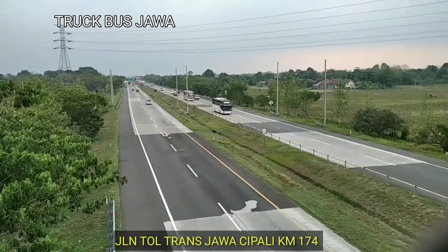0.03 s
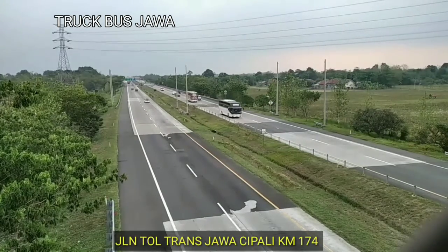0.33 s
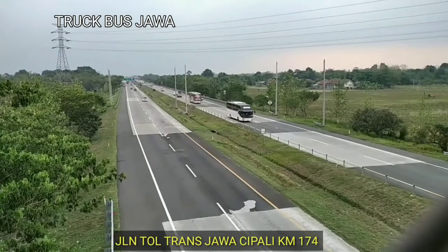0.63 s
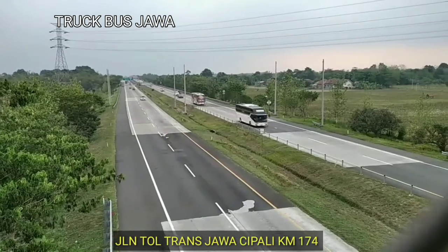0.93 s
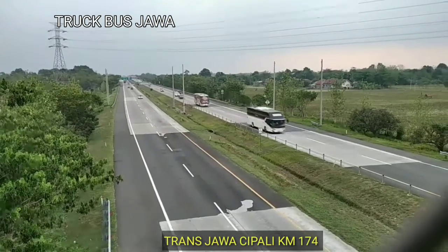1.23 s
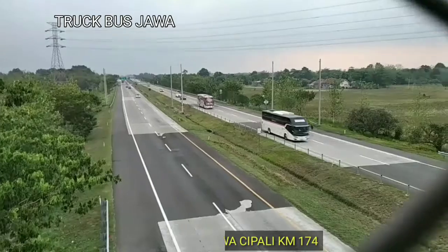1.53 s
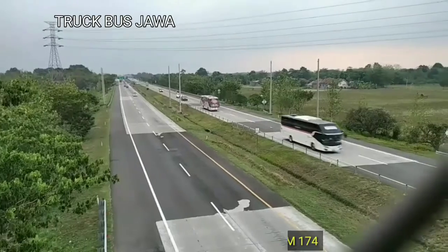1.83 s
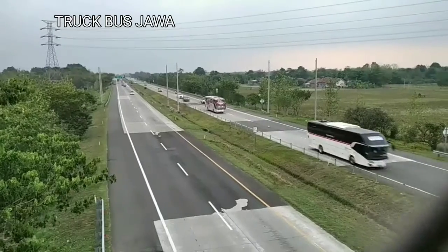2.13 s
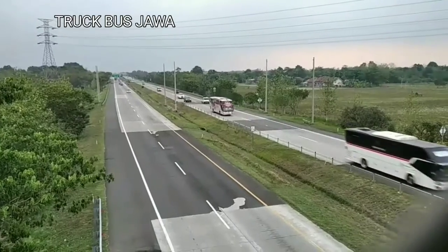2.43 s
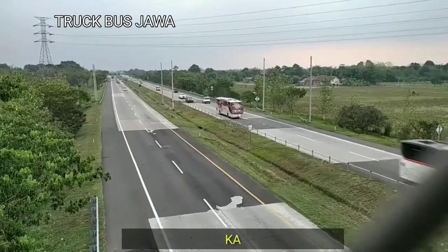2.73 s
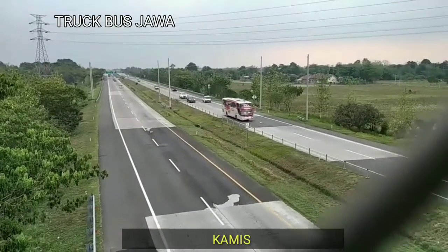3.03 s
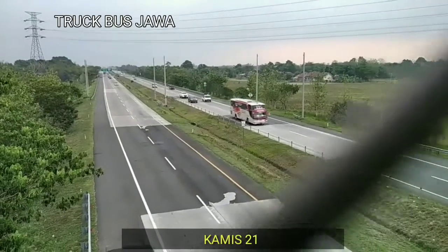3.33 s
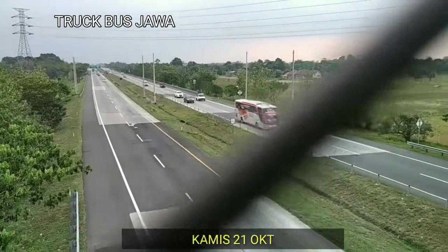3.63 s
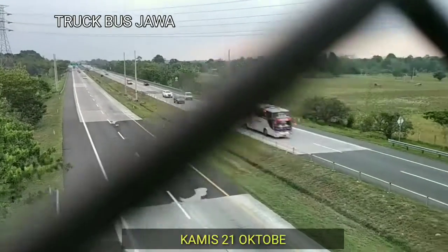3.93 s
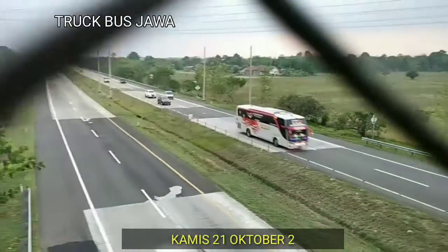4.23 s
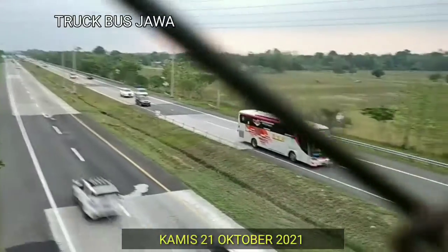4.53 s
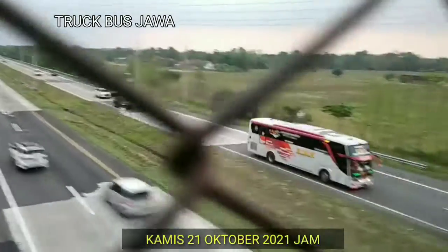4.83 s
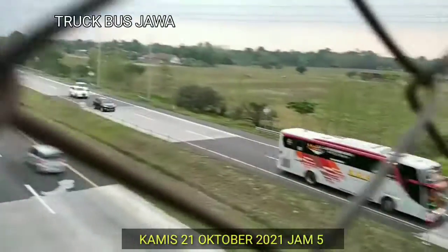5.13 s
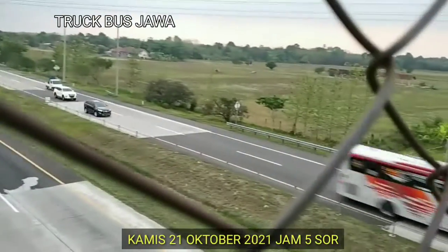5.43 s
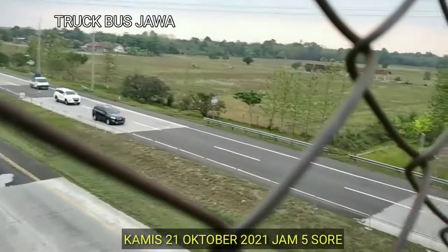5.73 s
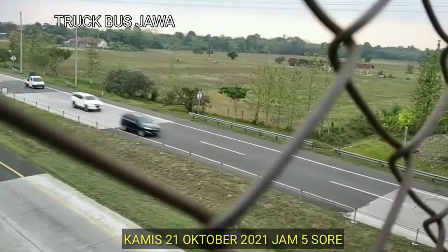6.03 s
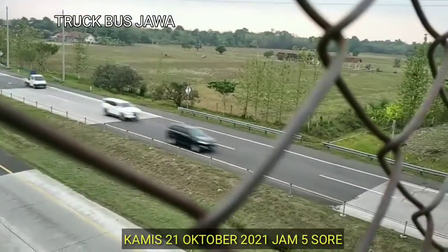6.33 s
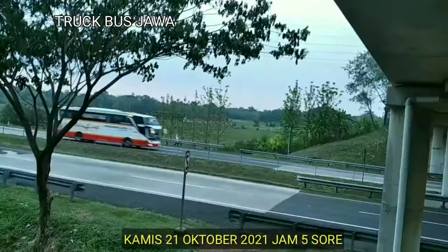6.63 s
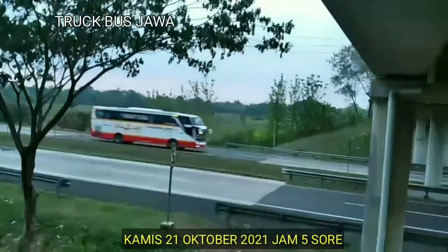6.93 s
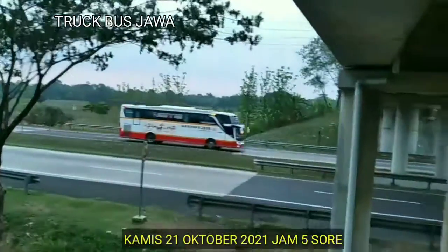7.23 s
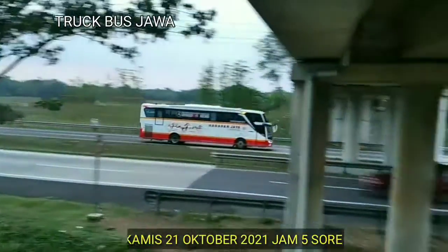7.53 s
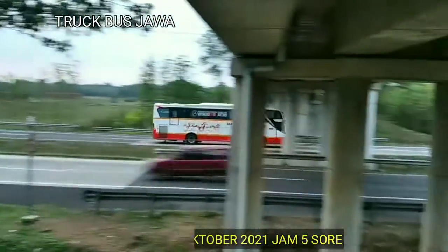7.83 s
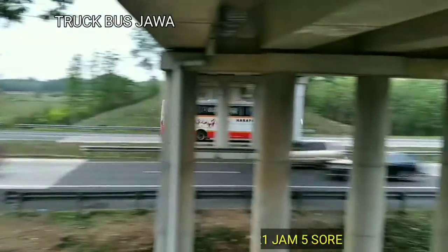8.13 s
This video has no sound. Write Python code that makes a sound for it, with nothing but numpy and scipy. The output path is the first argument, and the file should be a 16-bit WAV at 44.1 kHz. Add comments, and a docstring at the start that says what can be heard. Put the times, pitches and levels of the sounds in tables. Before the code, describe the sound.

Two diesel coaches and several cars roar past on a highway, fade to brief silence, then traffic returns closer and louder.

```python
"""Highway traffic at two microphone ports: coaches roar past an overpass, then cars run out and recede.
The sound fades to silence and returns under the bridge, closer and louder.
Road noise is four bands (body rumble, tyre roar, tread noise, air hiss) that swell and sink with
distance and reach the ports with a moving lag. Diesels drone below it, air whistles round a coach,
tyres knock on road joints; small ticks and faint chirps lie on top."""
import sys
import numpy as np
from scipy import signal
from scipy.fft import rfft, irfft, next_fast_len
from scipy.io import wavfile
from scipy.ndimage import map_coordinates

SR = 44100
rng = np.random.default_rng(int(sys.argv[2]) if len(sys.argv) > 2 else 0)


def bounce(signal):
    """Save signal as a 16-bit WAV file at the path given by the first command-line argument."""
    frames = np.transpose(np.atleast_2d(signal))
    limited = np.clip(frames, -1, 1)
    pcm = np.round(limited * 32767).astype(np.int16)
    wavfile.write(sys.argv[1], SR, pcm)


N = 366030

# Swells of road noise as vehicles near and go by; one coach can swell more than once as it crosses rough
# concrete and passes: (closest [s], approach [s], retreat [s], rumble [dB], roar [dB], tread [dB], hiss [dB])
COACH_PASSES = [(2.2, 0.66, 1, -33, -34, -32, -37), (2.82, 0.83, 1, -33.5, -32, -36, -34.5),
                (3.3, 0.26, 0.27, -30.5, -35.5, -40, -35.5), (3.68, 0.3, 0.32, -32.5, -40, -32, -33)]
CAR_PASSES = [(4.2, 0.16, 0.43, -30.5, -37, -27, -34.5), (4.54, 0.35, 0.57, -45, -31, -26.5, -33),
              (5.1, 0.21, 0.55, -38, -36, -31, -39), (5.8, 0.5, 0.88, -36.5, -36, -32.5, -37)]
UNDERPASS_PASSES = [(7.82, 0.3, 0.22, -28.5, -25, -37.5, -29.5), (8.13, 0.35, 0.82, -30, -21.5, -37.5, -29)]
# Steady far traffic: (rumble [dB], roar [dB], tread [dB], hiss [dB])
OVERPASS_WASH_DB = [-35.5, -37, -35, -42.5]
UNDERPASS_WASH_DB = [-27.5, -26, -22.5, -29.5]
# Distance exponents of power; air and barriers absorb treble: (rumble [-], roar [-], tread [-], hiss [-])
FALLOFF_EXPONENTS = [2.7, 3.4, 5.1, 5.9]
# Crossovers: (rumble to roar [Hz], roar to tread [Hz], tread to hiss [Hz])
BAND_EDGES_HZ = [430, 1100, 3000]
# Road noise spectra: (frequency [Hz], relative density [dB], left over right [dB])
COACH_SPECTRUM = [(54, -26.5, -1), (71, -12.5, -4.5), (113, -1.5, 2), (260, 0, 0), (403, -5, -2.5),
                  (563, -6, 4), (895, -3, -0.5), (1140, -7.5, 1.5), (1500, -5, 1), (2700, -12.5, 8.5),
                  (3470, -15, -1), (4820, -14.5, 8.5), (4860, -21.5, 8.5), (5500, -22, 6), (6850, -24, -1),
                  (8800, -20, 10.5), (11800, -29.5, 9.5), (14000, -32.5, 14)]
CAR_SPECTRUM = [(56, -25.5, -1.5), (70, -16, -3), (100, -1.5, -1), (175, 0.5, -5), (290, 3.5, -2),
                (420, 0, 4), (545, -6.5, -1.5), (695, 0.5, 0), (860, 2, 0.8), (1300, -3.5, -1.5),
                (1735, -3, 0.5), (2390, -9, 1.5), (3200, -12, 4.5), (4680, -10.5, 11), (4870, -18.5, -1),
                (8200, -15.5, 5), (11500, -24.5, 8), (14000, -26.5, 12.5)]
UNDERPASS_SPECTRUM = [(40.8, -23, -5), (55, -20, -4), (128, -10.5, 2), (252, -2.5, -0.5), (320, -3, 1.5),
                      (408, -7.5, -1.5), (503, -5, 0), (640, -5.5, -1), (950, -5.5, -0.5), (1500, -7, 1),
                      (2580, -9.5, 1.5), (4670, -18, 0.5), (4960, -25.5, -2), (7100, -23, 0.5),
                      (10500, -32.5, 1.5), (14000, -39.5, 1.4)]
FAR_SPECTRUM = [(51.5, -27, -2), (66, -12, 0), (119.5, 0, -0.5), (200, -1.5, 2), (260, -1.5, -1),
                (429, -3.5, 4), (500, -8.5, -9), (620, -13, -3), (1300, -6, 0.5), (2000, -11, -1),
                (2400, -8, -3.5), (2840, -16, -6), (3260, -24, 2), (4600, -17.5, 1), (4900, -26, -4),
                (8800, -27.5, 1), (14000, -36, 7)]
# Treble on the overpass: (time [s], gain [dB])
TREBLE_GAIN = [(0, -0.5), (1.2, -0.5), (1.68, -4.5), (1.73, -1), (2.2, -0.5), (4.84, -0.5), (4.9, -1),
               (5.6, -0.5), (6.3, -4.5)]
# Tyre and air resonances: (start [s], end [s], from [Hz], to [Hz], half width [octaves], boost [dB])
RESONANCES = [(1.75, 2.7, 1520, 1425, 0.2, 3.5), (2.64, 3.027, 780, 790, 0.18, 5.5),
              (3.033, 3.5, 870, 830, 0.38, 0.5), (2.79, 3.3, 325, 318, 0.12, 4),
              (3.12, 3.597, 3650, 3460, 0.073, 5.5), (3.15, 3.93, 8900, 8800, 0.14, 3.5),
              (3.548, 3.972, 359, 336, 0.073, 8), (4.002, 4.24, 533, 490, 0.33, 7),
              (4.053, 4.42, 1290, 1120, .3, 3), (4.202, 4.8, 7600, 7040, .6, 1),
              (4.47, 4.602, 952, 861, .22, 4.5), (4.551, 4.76, 2625, 2550, .12, 5),
              (4.6, 5.299, 1750, 1650, 0.33, 3), (5.285, 5.55, 803, 790, 0.47, 5),
              (6.8, 7.5, 1330, 1400, 0.16, 0.5), (7.0, 8.197, 243, 257, 0.099, 5.5),
              (7.72, 8.45, 730, 710, 0.26, 2.5)]
# Direction of the loudest vehicle: (time [s], left port lag [ms], direct over scattered [dB])
BEARING_ABOVE = [(0, -0.051, 0.5), (1.6, -0.086, -6), (2.5, -0.14, 0.5), (3.5, -0.29, -4.5),
                 (3.95, -0.4, -6), (4.08, -0.17, -1), (4.55, -0.078, 2), (5.45, 0.17, 3),
                 (6.5, 0.27, -11.5)]
BEARING_BELOW = [(6.85, -0.39, -0.5), (7.6, -0.33, -9), (7.9, -0.071, -7.5), (8.3, 0.15, 2.5)]
# Direct over scattered sound, by pitch: (frequency [Hz], offset [dB])
DIRECT_OFFSET = [(100, 4), (400, -1), (600, -2.5), (880, 8), (1130, -2.5), (1450, 3), (1950, -2), (2300, 0),
                 (2750, -3.5), (3300, -0.5), (4500, -7), (8000, -15.5)]
# First coach diesel: (time [s], crank rate [Hz], level of each of five orders [dB])
COACH_1_DIESEL = [(0, 39.25, -63, -52, -51, -51, -54), (1.1, 39.5, -55, -58, -39.5, -55, -51),
                  (1.7, 38.78, -44, -52.5, -44, -38, -41), (2.3, 38.1, -44, -43, -48, -40.5, -37),
                  (2.9, 37.34, -47, -39, -53.5, -55, -48.5), (3.8, 36.5, -69.5, -62, -65.5, -64, -60.5)]
# Its orders: (multiple of crank rate [-])
COACH_1_ORDERS = [2, 4, 5, 6, 7]
# Second coach diesel: (time [s], firing rate [Hz], level of each of orders 1-3 [dB])
COACH_2_DIESEL = [(2.3, 117.2, -63, -60, -66), (2.85, 118.5, -51.5, -39, -52), (3.15, 116.1, -40, -34, -47),
                  (3.5, 115.8, -36, -30, -41), (3.85, 111.5, -38.5, -42, -42.5),
                  (4.35, 109.5, -45.5, -45.5, -49), (5.0, 107.4, -44.5, -39.5, -53),
                  (5.65, 105.7, -52, -39.5, -51), (6.0, 105.5, -60, -50, -60.5)]
# Car whine, far lorry, diesel and drone under the bridge: (time [s], fundamental [Hz], level [dB])
CAR_ENGINE = [(3.85, 520, -69.5), (4.12, 500, -39), (4.3, 488, -42), (4.6, 490, -42.5), (4.85, 480, -43),
              (5.2, 475, -81)]
LORRY_DIESEL = [(3.8, 89, -70), (4.4, 88, -46), (5.1, 87, -44.5), (5.8, 86.5, -47)]
UNDERPASS_DIESEL = [(6.88, 58.7, -52), (7.0, 59.1, -38.5), (7.6, 58.98, -34), (8.3, 57.85, -31)]
UNDERPASS_DRONE = [(6.9, 97.3, -51), (7.05, 97.2, -34.5), (7.7, 96.6, -37), (8.3, 96.5, -29.5)]
# Orders of the underpass diesel: (multiple of firing rate [-], gain [dB])
UNDERPASS_ORDERS = [(1, -5.5), (2, -10), (3, -3.5), (4, -1), (6, -1.5), (11, -6.5)]
# Air whistle round a coach: (time [s], pitch [Hz], level [dB])
AIR_WHISTLE = [(3.51, 4740, -80), (3.54, 4700, -33.5), (3.69, 4620, -39), (3.76, 4680, -31),
               (3.88, 4550, -33.5), (3.97, 4500, -33), (4.01, 4500, -89)]
# Tyres on road joints: (time [s], peak before filter [dB], centre [Hz])
JOINT_KNOCKS = [(4.141, -5, 1020), (4.203, -14.5, 1334), (4.228, -7.5, 970), (4.386, -2.5, 1050),
                (4.443, -14, 950), (4.559, -7, 860), (4.804, -5, 775), (4.886, -3.5, 1090),
                (5.261, -15, 1650), (5.527, -10.5, 898), (6.375, -17, 975)]
# Dry ticks: (time [s], peak before filter [dB])
DRY_TICKS = [(1.7115, -28.5), (2.48, -20), (2.6905, -12.5)]
# High chirps: (time [s], pitch [Hz], level [dB])
HIGH_CHIRPS = [(5.305, 12470, -47), (5.94, 9950, -38), (6.02, 9950, -44), (6.104, 10050, -38)]

SILENT_FROM_S, RETURN_S = 6.6, 6.8
PORT_SPACING_MS, CUTOFF_HZ = 0.46, 14300
FRAME, HOP = 2048, 512
TIME_S = np.arange(N) / SR
FRAME_S = np.arange(N // HOP + 2) * HOP / SR
BIN_HZ = np.maximum(np.arange(FRAME // 2 + 1) * SR / FRAME, 1)[:, None]


def traffic(treble_from_hz=4400):
    """Road noise of passing and far vehicles, on the overpass and then under the bridge."""
    above = passing(COACH_PASSES, COACH_SPECTRUM) + passing(CAR_PASSES, CAR_SPECTRUM) + far_wash()
    treble = 1 / (1 + (treble_from_hz / BIN_HZ) ** 4)
    above *= from_db(treble * in_time(TREBLE_GAIN, FRAME_S)[0]) ** 2
    below = passing(UNDERPASS_PASSES, UNDERPASS_SPECTRUM)
    below += road_power(UNDERPASS_SPECTRUM, UNDERPASS_WASH_DB)
    power = np.where(under_bridge(FRAME_S), below, above) * from_db(howls_db()) ** 2
    field = port_field(power)
    waver_db = flutter_db(depth_db=0.78, rate_hz=26, bands=12)
    waver_db += flutter_db(depth_db=2.0, rate_hz=8, bands=170)
    waver_db += flutter_db(depth_db=0.74, rate_hz=0.76, bands=110)   # slow fine ripple in the timbre of the ports
    roar = signal.istft(field * from_db(waver_db), nperseg=FRAME, noverlap=FRAME - HOP)[1][:, :N]
    turbulence_db = 0.86 * drift(45)
    return from_db(turbulence_db) * roar


def passing(vehicles, spectrum):
    """Power of vehicles on a straight road; nearness is closest over present distance."""
    power = 0
    for closest_s, approach_s, retreat_s, *levels_db in vehicles:
        scale_s = np.where(FRAME_S < closest_s, approach_s, retreat_s)
        nearness = 1 / np.hypot(1, (FRAME_S - closest_s) / scale_s)
        power += road_power(spectrum, levels_db, nearness)
    return power


def road_power(spectrum, levels_db, nearness=1):
    """Power per port of four overlapping bands, each with its own falloff over distance."""
    density_db, pan_db = in_pitch(spectrum)
    lowpasses = [0] + [1 / (1 + (BIN_HZ / hz) ** 8) for hz in BAND_EDGES_HZ] + [1]
    power = 0
    for low, high, db, exponent in zip(lowpasses, lowpasses[1:], levels_db, FALLOFF_EXPONENTS):
        band = from_db(density_db) ** 2 * (high - low)
        power += band / band.mean(axis=0) * from_db(db) ** 2 * nearness ** exponent
    left_share = 1 / (1 + from_db(-pan_db) ** 2)
    return 2 * np.array([left_share, 1 - left_share]) * power


def howls_db(edge_s=0.034, wobble=0.012):
    """Tyre and air resonances: gliding boosts of the road noise."""
    boost_db = 0
    for start_s, end_s, from_hz, to_hz, width_oct, db in RESONANCES:
        gate = (np.tanh((FRAME_S - start_s) / edge_s) - np.tanh((FRAME_S - end_s) / edge_s)) / 2
        hz = np.interp(FRAME_S, [start_s, end_s], [from_hz, to_hz]) * (1 + wobble * drift(30, FRAME_S))
        boost_db += db * gate * np.exp(-(np.log2(BIN_HZ / hz) / width_oct) ** 2)
    return boost_db


def port_field(power):
    """Noise spectra at the ports: direct sound with a lag, plus scatter, coherent for long waves."""
    lag_ms, direct_db = np.where(under_bridge(FRAME_S),
                                 in_time(BEARING_BELOW, FRAME_S), in_time(BEARING_ABOVE, FRAME_S))
    sides = np.array([1, -1])[:, None, None]
    direct = white_stft() * np.exp(-1j * np.pi * sides * BIN_HZ * lag_ms / 1000)
    coherence = 0.92 * np.sinc(2 * BIN_HZ * PORT_SPACING_MS / 1000)
    common = np.sqrt((1 + coherence) / 2) * white_stft()
    opposed = sides * np.sqrt((1 - coherence) / 2) * white_stft()
    ratio = from_db(direct_db + in_pitch(DIRECT_OFFSET)[0])
    return (ratio * direct + common + opposed) * np.sqrt(power / (1 + ratio ** 2))


def flutter_db(depth_db, rate_hz, bands):
    """Paths of changing length add and cancel: the level wavers band by band."""
    position = np.interp(np.log(BIN_HZ + 500), np.log([500, CUTOFF_HZ + 500]), [0, bands - 1])
    weights = np.sqrt(np.maximum(1 - abs(position - np.arange(bands)), 0))
    return depth_db * weights @ np.array([drift(rate_hz, FRAME_S) for _ in range(bands)])


def engines():
    """Two coaches, a car and a lorry drop in pitch as they pass; two engines drone under the bridge."""
    crank_hz, *orders_db = in_time(COACH_1_DIESEL)
    coach_1 = engine(crank_hz, 0, zip(COACH_1_ORDERS, orders_db), wobble=0.013, waver_db=3)
    firing_hz, *orders_db = in_time(COACH_2_DIESEL)
    coach_2 = engine(firing_hz, 0, enumerate(orders_db, 1), wobble=0.0084, waver_db=1.5)
    car = engine(*in_time(CAR_ENGINE), [(1, 0)], wobble=0.01175, waver_db=3)
    lorry = engine(*in_time(LORRY_DIESEL), [(1, -2.5), (2, -1), (4, -6.5)], wobble=0.012, waver_db=4.5)
    diesel = engine(*in_time(UNDERPASS_DIESEL), UNDERPASS_ORDERS, wobble=0.0043, waver_db=3)
    drone = engine(*in_time(UNDERPASS_DRONE), [(1, -1.1)], wobble=0.0095, waver_db=0.5)
    return np.where(under_bridge(TIME_S), diesel + drone, coach_1 + coach_2 + car + lorry)


def engine(hz, db, orders, wobble, waver_db):
    """Harmonics of an engine's rate, unsteady in pitch and level."""
    phase = 2 * np.pi * np.cumsum(hz * (1 + wobble * drift(18))) / SR
    tones = 0
    for order, order_db in orders:
        gain = from_db(order_db + waver_db * drift(9))
        tones += gain * np.sin(order * phase + rng.uniform(0, 2 * np.pi))
    return np.sqrt(2) * from_db(db) * tones


def whistle(width_hz=280, waver_db=3, right_db=-5.5):
    """Air through a gap: a breathy tone that sags in pitch and breaks off."""
    hz, db = in_time(AIR_WHISTLE)
    db += waver_db * drift(35)
    phase = 2 * np.pi * np.cumsum(hz) / SR
    ports = [drift(width_hz) * np.sin(phase) + drift(width_hz) * np.cos(phase) for _ in range(2)]
    return from_db([db, db + right_db]) * ports


def knocks(spread=1.18):
    """Tyres strike road joints: narrow noise bursts."""
    return sum(bursts([(s, db)], hz / spread, hz * spread, rise_s=0.023, t60_s=0.063)
               for s, db, hz in JOINT_KNOCKS)


def ticks(right_db=-17):
    """Small dry ticks near the left port."""
    left = bursts(DRY_TICKS, low_hz=5870, high_hz=11100, rise_s=0.011, t60_s=0.021)
    return np.array([left, from_db(right_db) * left])


def chirps(half_width_s=0.017):
    """Faint, short sine peeps."""
    return sum(from_db(db) * np.exp(-((TIME_S - s) / half_width_s) ** 2)
               * np.sin(2 * np.pi * hz * TIME_S) for s, hz, db in HIGH_CHIRPS)


def far_wash(turn_s=(2.2, 3.5), turned_db=-5):
    """Power of far traffic; sinks as the microphone turns from the road ahead."""
    facing_db = np.interp(FRAME_S, turn_s, [0, turned_db])
    return from_db(facing_db) ** 2 * road_power(FAR_SPECTRUM, OVERPASS_WASH_DB)


def bursts(events, low_hz, high_hz, rise_s, t60_s):
    """Band-passed noise puffs: 60 dB up in rise_s, 60 dB down in t60_s."""
    envelope = 0
    for s, db in events:
        drop_db = 60 * np.maximum((s - TIME_S) / rise_s, (TIME_S - s) / t60_s)
        envelope += from_db(db - np.minimum(drop_db, 120))
    band = signal.butter(2, [low_hz, high_hz], "band", fs=SR, output="sos")
    return signal.sosfilt(band, envelope * rng.standard_normal(N) + 1e-18)


def from_db(db):
    """Decibels to gain."""
    return 10 ** (np.asarray(db) / 20)


def in_time(rows, at_s=TIME_S):
    """Table columns interpolated over time."""
    s, *columns = np.transpose(rows)
    return [np.interp(at_s, s, column) for column in columns]


def in_pitch(rows):
    """Table columns interpolated over log frequency."""
    hz, *columns = np.transpose(rows)
    return [np.interp(np.log(BIN_HZ), np.log(hz), column) for column in columns]


def drift(rate_hz, at_s=TIME_S):
    """Smooth random curve, spread about 1."""
    knots = rng.standard_normal(int(N / SR * rate_hz) + 4)
    steps = np.arange(0, len(knots) - 1, 1 / 10)
    return np.interp(at_s * rate_hz, steps, map_coordinates(knots, [steps], order=3, mode="nearest"))


def white_stft():
    """Short-time spectrum of white noise, rms 1."""
    noise = rng.standard_normal(N + FRAME)
    return signal.stft(noise, nperseg=FRAME, noverlap=FRAME - HOP)[2][:, :len(FRAME_S)]


def under_bridge(at_s):
    """True from the middle of the silence on."""
    return at_s > (SILENT_FROM_S + RETURN_S) / 2


def fade(out_s=2.354, out_exponent=1.195, in_s=0.064):
    """Long fade-out, short silence, quick return."""
    leaving = np.clip((SILENT_FROM_S - TIME_S) / out_s, 0, 1) ** out_exponent
    returning = 1 - np.exp(-np.maximum(TIME_S - RETURN_S, 0) / in_s)
    return leaving + returning


def scene():
    """All sources at the left and right ports."""
    return traffic() + engines() + whistle() + knocks() + ticks() + chirps()


def record(dry):
    """Low cut, fade, steep high cut; a shelf thins the right port's bass."""
    low_cut_hz, shelf_hz, shelf_db = 45, 420, -13.5
    low_cut = signal.butter(4, low_cut_hz, "high", fs=SR, output="sos")
    ports = signal.sosfilt(low_cut, dry) * fade()
    size = next_fast_len(N + FRAME)
    hz = np.arange(size // 2 + 1) * SR / size
    shelf = from_db(shelf_db / (1 + (hz / shelf_hz) ** 16))
    high_cut = 1 / np.sqrt(1 + (hz / CUTOFF_HZ) ** 400)
    return irfft(rfft(ports, size) * np.array([high_cut, high_cut * shelf]), size)[:, :N]


dry = scene()
out = record(dry)
bounce(out)
```